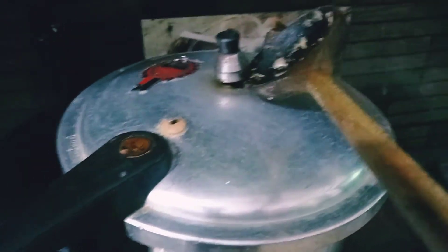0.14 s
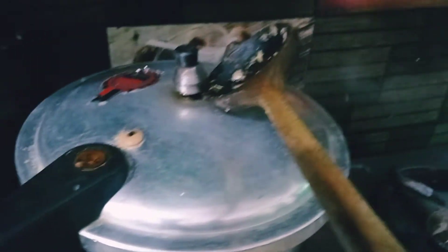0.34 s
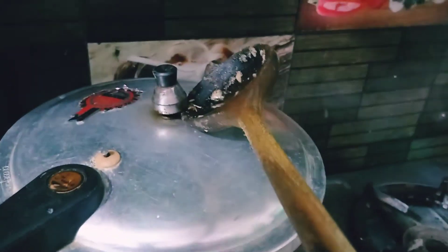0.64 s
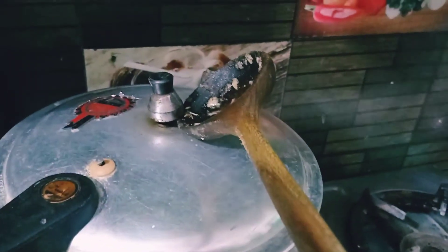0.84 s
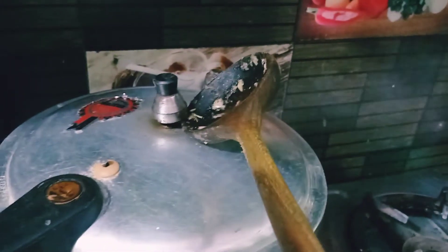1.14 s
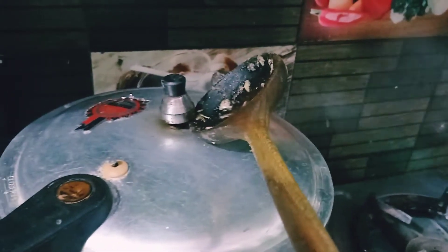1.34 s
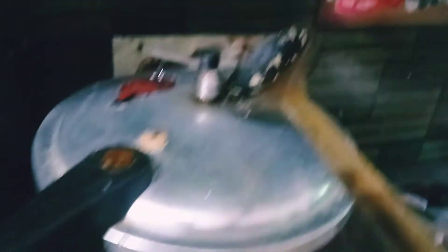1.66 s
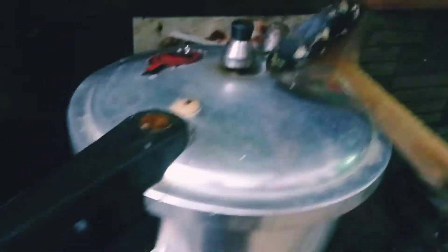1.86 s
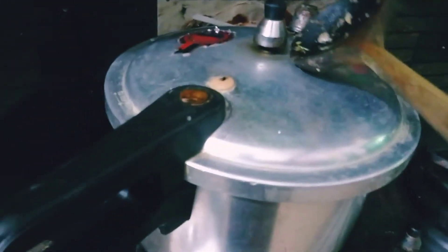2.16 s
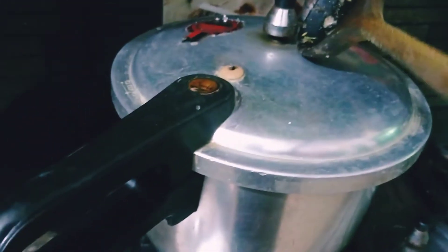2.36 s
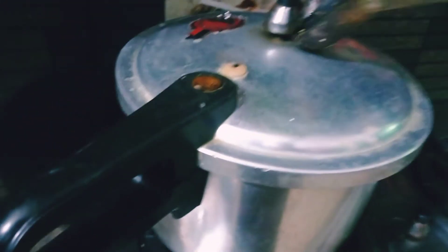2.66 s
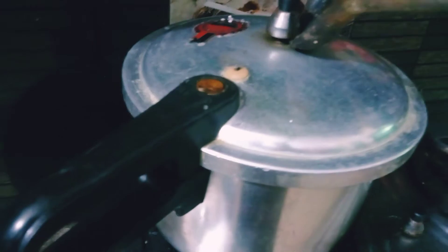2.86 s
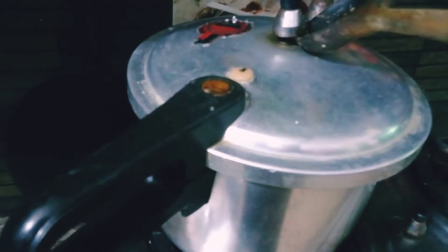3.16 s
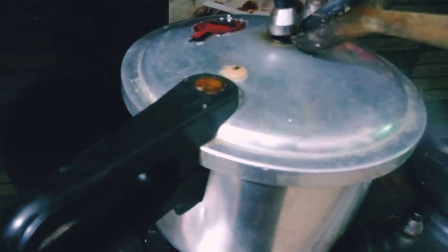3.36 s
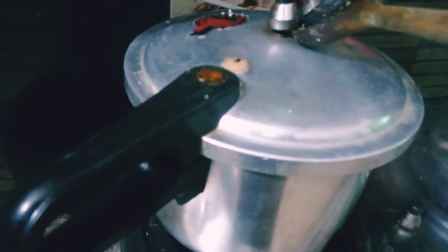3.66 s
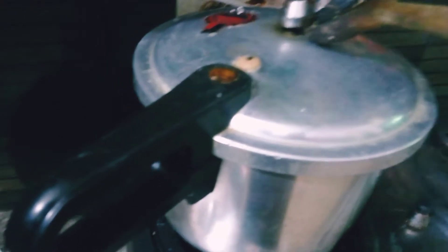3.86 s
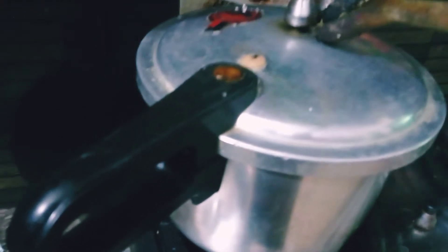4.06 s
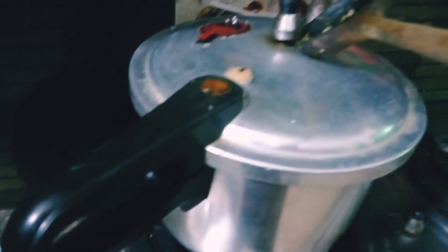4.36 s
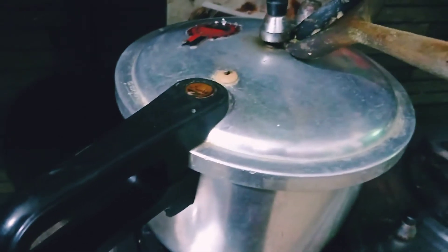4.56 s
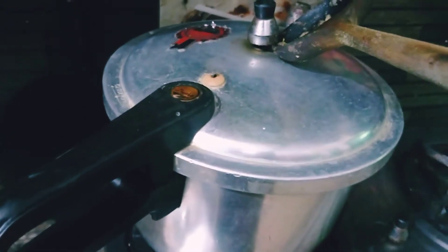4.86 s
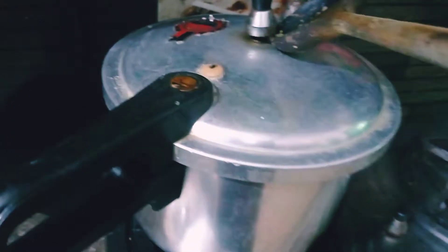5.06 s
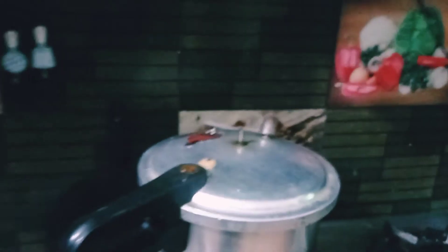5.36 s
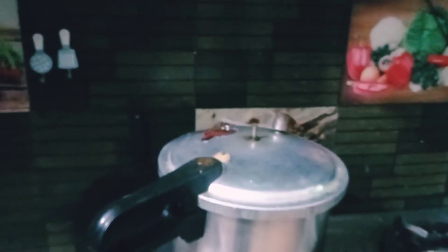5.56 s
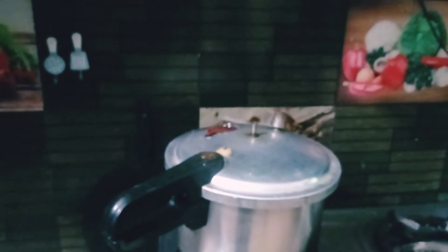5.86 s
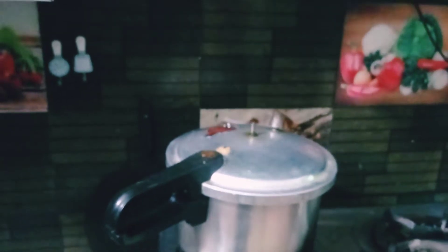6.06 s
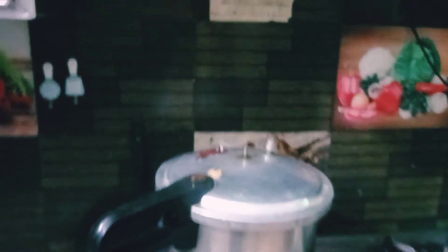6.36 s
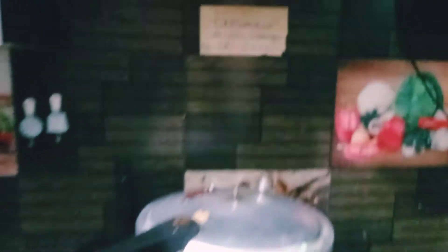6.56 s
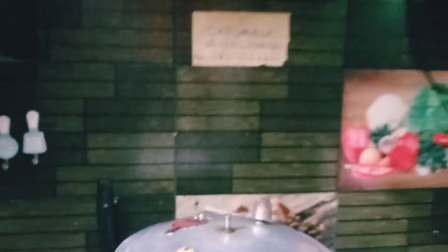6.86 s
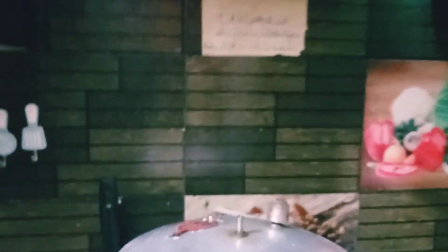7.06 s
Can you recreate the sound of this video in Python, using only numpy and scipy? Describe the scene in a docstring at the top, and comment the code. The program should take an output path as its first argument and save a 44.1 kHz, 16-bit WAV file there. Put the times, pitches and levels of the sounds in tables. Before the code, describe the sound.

From 0 to 1.8 seconds, a pressure cooker close to the microphone releases a strong, bright rush of steam, slightly fluttering, with a thin breathy whistle high inside it. At about 1.8 the valve weight drops: a dull, hollow knock rings the metal pot with a low, wavering hum, and the hiss dies away quickly. Another knock follows near 2.1, with weaker ones around 2.5 to 2.7, over a very thin, uneven leak with tiny puffs. At 3.0 a faint bump precedes a sudden loud burst of steam, which settles into a wavering rush with airy whistling between 3.8 and 4.8. At 5.13 it cuts out for an instant, blips, and returns as a crisper, thinner, softer hiss from further away, steady until about 7 seconds. Around 6.6 to 6.75 there is a barely audible finger rub and a small tap on the microphone.

```python
"""In a kitchen, a pressure cooker vents on a stove, close to a microphone. A ladle tilts the valve weight, slips off
with knocks that ring the pot, leaves a thin leak, then lifts the weight again. At an edit cut the sound stops,
blips and fades in on the bare vent from further away. The steam is shaped noise with breathy tones, the pot is
a set of fading sines, and fingers rub and tap the microphone's case over a faint steady background."""
import sys
import numpy as np
from scipy import signal
from scipy.fft import rfft, irfft, next_fast_len
from scipy.io import wavfile
from scipy.ndimage import uniform_filter1d, map_coordinates

SR = 44100
rng = np.random.default_rng(int(sys.argv[2]) if len(sys.argv) > 2 else 0)


def file_out(sig):
    """Save sig as 16-bit WAV at sys.argv[1]."""
    # one column per channel
    cols = np.atleast_2d(sig).T
    # limit, then scale
    lim = np.clip(cols, -1, 1)
    pcm = np.round(lim * 32767).astype(np.int16)
    wavfile.write(sys.argv[1], SR, pcm)


N = 317961  # length in samples

# The kitchen and microphone at rest. Each row: frequency in Hz, relative strength in dB per Hz.
AIR = [(12, -51), (20, -5.5), (95, -4.5), (168, -5.5), (245, 0.5), (290, -1.5), (604, -20), (1800, -31),
       (2340, -44), (3960, -120)]
# A finger slides on the case. One row: start in seconds, length in seconds, level in dB.
RUB = (6.585, .11, -72)
# A finger taps the case. One row: start in seconds, then the strengths in dB of tick, snap and bump before shaping.
TAP = (6.7355, -45, -27, -54)
# How the pot rings. Each row: frequency in Hz, strength in dB, time to fall 60 dB in seconds, sign (+1 or -1).
POT_MODES = [(270.5, -6, .55, 1), (278.3, -8, .45, -1), (371, 0, .4, 1), (474, -8, .2, 1),
             (620, -16, .15, 1), (1125, -14, .12, 1), (1265, -14, .12, 1)]
# Ladle knocks and later swells of the ringing pot. Each row: start in seconds, ring level in dB, swell in seconds,
# extra dB for the second mode, extra dB for the upper modes, thud level in dB, time for the thud to fall 60 dB
# in seconds.
KNOCKS_AND_SWELLS = [(1.809, -33.5, 0.063, -28, 2, -48, 0.31), (1.851, -67, 0.046, 29.5, 25, -48, 0.34),
                     (2.096, -36, 0.065, -4, 2, -51.5, 0.42), (2.529, -45, 0.072, -16, -9, -62, 0.17),
                     (2.667, -50, 0.039, -18, -20, -71, .15), (2.87, -81, .02, 6, 10, -77, .15),
                     (3.036, -68, 0.017, 10, 11, -51, 0.24), (3.142, -53, 0.041, 0, 7, -56, 0.58)]
# Breathy tones in the gap around the weight. Each row: start in seconds, length in seconds, pitch in Hz,
# width in Hz, level in dB.
WHISTLES = [(0.293, 1.43, 4223, 280, -36), (.3, 1.1, 4640, 160, -37.5), (1.09, 0.17, 4260, 350, -32.5),
            (2.545, 0.069, 810, 90, -73), (2.766, 0.046, 820, 90, -70), (2.885, 0.057, 870, 90, -66.5),
            (3.8, 0.057, 2340, 220, -43), (3.9, 0.31, 4570, 150, -34.5), (4.207, 0.085, 2250, 220, -38),
            (4.198, 0.43, 5040, 450, -34), (4.36, 0.097, 2298, 260, -32), (4.545, 0.031, 2250, 220, -30),
            (4.754, 0.054, 2220, 220, -37), (5.02, 0.056, 5040, 300, -34), (5.044, 0.021, 2180, 220, -36)]
# The jet in four states: weight tilted, weight seated, weight lifted, bare vent from afar. Each row: time in seconds,
# hiss level in dB, then rumble, roar, fizz and sizzle in dB relative to the hiss.
JET_LEVELS = [
    [(0.0, -31, -10, -5.5, -12, -19), (0.224, -28.5, -13, -5.5, -17, -18),
     (0.482, -32, -9.5, -3, -13, -14.5), (0.962, -29.5, -10.5, -7, -15.5, -20),
     (1.51, -31, -10, -4, -14, -16), (1.724, -27.5, -12, -7.5, -14.5, -30),
     (1.79, -30.5, -10.5, -7.5, -14, -22)],
    [(2.1, -52.5, -19, -13, -18, -24), (2.16, -52.5, -35, -16, -16, -25),
     (2.352, -49.5, -48, -21, -26, -27), (2.496, -52.5, -31, -14.5, -16, -24),
     (2.57, -43, -30, -23, -23, -26), (2.636, -54.5, -26, -8.5, -14, -26),
     (2.838, -43, -21.5, -15.5, -16, -25), (2.948, -58.5, -13, -4, -14, -23),
     (3.0, -46, -30, -18, -15, -28.5)],
    [(2.98, -56, -30, -15, -14, -36), (3.0, -44.5, -11, -15, -12, -19),
     (3.06, -20.5, -21.5, -12.5, -15, -25), (3.12, -27.5, -10.5, -11, -12, -16),
     (3.21, -30, -15.5, -13, -10, -14), (3.45, -27, -23.5, -16, -14.5, -17.5),
     (3.56, -31.5, -15.5, -9, -11, -7), (3.81, -25, -18, -9, -19.5, -16.5),
     (4.06, -27.5, -14.5, -10, -17, -14), (4.38, -29, -13.5, -8, -19, -16),
     (4.88, -25, -16, -11.5, -20.5, -21), (5.09, -26.5, -16.5, -12.5, -20, -21),
     (5.11, -27.5, -18.5, -13, -17, -21)],
    [(5.17, -32, -21.5, -13.5, -9, -14), (5.41, -32.5, -24, -13.5, -14.5, -14),
     (6.37, -34, -24, -13, -11, -25), (6.73, -36.5, -18.5, -8.5, -11, -21),
     (7.2, -34.5, -21.5, -10.5, -13, -20)],
]
# The colour of the jet in each state. Each row: frequency in Hz, relative strength in dB per Hz.
TILTED_COLOUR = [(59, -84), (100, -54), (379, -32), (671, -16), (1190, -7.5), (1320, -10), (1530, -6.5),
                 (1970, -4.5), (2340, 3), (3500, -4), (4230, 3), (6740, -2.5), (8320, -11), (11400, -19),
                 (15700, -21)]
SEATED_COLOUR = [(320, -45), (550, -28), (814, -20), (1030, -22.5), (2000, -21.5), (4260, -11.5),
                 (4830, -6), (5720, -4.5), (7260, -5.5), (7900, -16.5), (9340, -16.5), (10200, -21.5),
                 (13600, -31), (15700, -26)]
LIFTED_COLOUR = [(59, -80), (100, -51), (248, -28.5), (567, -22), (700, -10), (942, -7.5), (1320, -10),
                 (1530, -6), (1850, -14.5), (2240, -4.5), (3010, -14.5), (6190, -7), (10100, -28),
                 (13300, -35.5), (15700, -39)]
BARE_COLOUR = [(59, -70), (100, -33), (294, -61), (334, -37.5), (459, -40.5), (700, -26.5), (2190, -19),
               (3210, -19), (4510, -5.5), (5010, -14.5), (6320, -4.5), (7980, -20), (9250, -9.5),
               (13500, -3), (15700, 3)]
# Resonances of the microphone port. Each row: frequency in Hz, width in Hz, boost in dB.
PORT = [(6440, 730, 4), (15140, 1200, 15)]
# Standing ridges between lid, ladle and tiles, one list per state. Each row: frequency in Hz, width in Hz, boost in dB.
RIDGES = [
    [(241, 170, 8), (1540, 53, 7), (4690, 20, 3), (6240, 91, 5), (6840, 69, 12)],
    [(5750, 94, 9.5), (6230, 99, 7.5), (6500, 87, 6), (6740, 58, 0)],
    [(2380, 89, -2), (5630, 27, 7.5), (6323, 97, 8.5), (6450, 92, -5), (6910, 150, 8)],
    [(4480, 120, -5), (5630, 62, -11), (6570, 110, -13.5)],
]
# Borders in Hz between rumble, roar, edge, hiss, fizz and sizzle.
LAYER_BORDERS_HZ = [1800, 3400, 5200, 8500, 13800]
# Depth in dB of the drifting ridges in each state, before the bass is deepened.
DRIFT_DB = [1.63, 1.9, 2.22, 1.95]
# Base level in dB of the edge over the hiss in each state.
EDGE_DB = [-1.3, 0.62, 0.35, -4.9]
# Time in seconds for rumble, roar, edge, hiss, fizz and sizzle to fall 60 dB once the weight drops.
DIE_T60 = [.55, 0.45, 0.65, .38, 0.21, .26]
# Times in seconds when the weight lifts and when the bare vent takes over.
HANDOVER_TIMES = [3.0, 5.14]

AIR_DB = -78.5
CLACK_UNDER_THUD_DB, CLACK_T60 = 3, .13  # dB below the thud, seconds to fall 60 dB
SWAY_RAD, SLOSH_DB = .7, 1.2  # water moving inside the pot sways the phase and the level
FLICKER_DB, SWELL_S, FADE_S = 1.2, 0.014, 0.066  # flicker, rise and fall of the breathy tones
SHUT_S = 1.793  # the weight drops onto its seat
HANDOVER_S = 0.026  # length of each handover
EDGE_FOLLOWS = 0.69  # dB of edge per dB of roar
CUT_S, GAP_S, BLIP_S, RETURN_S = 5.1255, .0229, .0014, .0035  # edit cut; lengths of silence, blip, fade in
BLIP_DB, RETURN_DB = -3, -22  # gain of the blip, and where the fade in starts
TOP_HZ = 15720  # middle of the upper cutoff


def amp(db):
    """Turn decibels into a plain multiplier."""
    return 10 ** (np.asarray(db) / 20)


def unit(x):
    """Scale to an average (RMS) strength of one."""
    return x / np.sqrt(np.mean(x ** 2) + 1e-20)


def along(points, hz):
    """Read a curve of (Hz, value) points, with straight lines on a log frequency axis."""
    f, values = np.transpose(points)
    return np.interp(np.log(hz + 1), np.log(f + 1), values)


def curves(rows):
    """Give one value per sample for each column after the time."""
    times, *columns = np.transpose(rows)
    return [np.interp(np.arange(N) / SR, times, column) for column in columns]


def wobble(rate, size=N):
    """Draw a smooth random curve through rate random points a second."""
    points = rng.standard_normal(int(size * rate / SR) + 4)
    return map_coordinates(points, [np.arange(size) * rate / SR])


def filtered(x, response):
    """Multiply the spectrum of x by a response that depends on frequency."""
    m = next_fast_len(N + 8192)
    return irfft(rfft(x, m) * response(np.fft.rfftfreq(m, 1 / SR)), m)[..., :N]


def boosts(peaks, hz):
    """Add up, in dB, bell-shaped boosts given as (Hz, width, boost)."""
    return sum(db / (1 + (2 * (hz - centre) / width) ** 2) for centre, width, db in peaks)


def gate(t, length, rise, fall):
    """Rise just before time 0, hold for the length, then fall."""
    ramp = np.minimum(1 + t / rise, 1 - (t - length) / fall)
    return np.sin(np.pi / 2 * np.clip(ramp, 0, 1)) ** 2


def patches(x, size, hz_bins, frames, depth_db):
    """Vary the gain at random over frequency and time, smoothly and more deeply in the bass."""
    f, _, z = signal.stft(x, SR, nperseg=size)
    field = uniform_filter1d(rng.standard_normal(z.shape), hz_bins, axis=0)
    field = uniform_filter1d(field, frames, axis=1)
    depth = depth_db * (1 + 1.4 / (1 + (f[:, None] / 450) ** 2))
    return signal.istft(z * amp(depth * unit(field)), nperseg=size)[1][:N]


def kitchen():
    """The room and microphone at rest give a faint steady floor of shaped noise."""
    floor = filtered(rng.standard_normal(N), lambda hz: amp(along(AIR, hz)))
    return amp(AIR_DB) * unit(floor)


def fingers():
    """Skin sliding on the case is lumpy low noise; a tap is three short bursts: tick, snap and low bump."""
    start, length, rub_db = RUB
    rub = filtered(rng.standard_normal(N), lambda hz: np.exp(-((hz - 190) / 90) ** 2))
    rub = rub * amp(2.1 * wobble(45))
    out = amp(rub_db) * gate(np.arange(N) / SR - start, length, .025, .025) * unit(rub)

    s, tick_db, snap_db, bump_db = TAP
    t = np.arange(SR // 10) / SR
    tick = amp(tick_db) * np.exp(-((t - .003) / 0.0026) ** 2) * np.sin(2 * np.pi * 500 * t)
    snap = amp(snap_db) * np.exp(-((t - .002) / .00025) ** 2) * np.sin(2 * np.pi * 1500 * (t - .002))
    bump = amp(bump_db) * np.exp(-((t - .011) / 0.0093) ** 2) * np.sin(2 * np.pi * 110 * t)
    out[round(s * SR):][:len(t)] += tick + snap + bump
    return out


def ringing_pot():
    """Soft knocks thud and the pot rings; its lowest mode is a close pair, so it beats, and it swells again later."""
    out, t = np.zeros(N + SR), np.arange(SR // 2) / SR
    dull = signal.butter(2, [190, 560], "bandpass", fs=SR)
    bright = signal.butter(1, [600, 1800], "bandpass", fs=SR)
    for s, ring_db, swell, second_db, upper_db, thud_db, thud_t60 in KNOCKS_AND_SWELLS:
        rise = np.sin(np.pi / 2 * np.clip(t / swell, 0, 1)) ** 2
        # the first two sines are the lowest pair, the third is the second mode
        mode_db = [0, 0, second_db] + [upper_db] * (len(POT_MODES) - 3)
        sway = SWAY_RAD * wobble(25, size=len(t))
        slosh_db = SLOSH_DB * wobble(18, size=len(t))
        ring = np.zeros(len(t))
        for (hz, db, t60, sign), extra_db in zip(POT_MODES, mode_db):
            fading = amp(db + extra_db + slosh_db - 60 * t / t60)
            ring += sign * fading * np.sin(2 * np.pi * hz * t + sway)
        thud_noise = unit(signal.lfilter(*dull, rng.standard_normal(len(t))))
        thud = amp(thud_db - 60 * t / thud_t60) * thud_noise
        clack_noise = unit(signal.lfilter(*bright, rng.standard_normal(len(t))))
        clack = amp(thud_db - CLACK_UNDER_THUD_DB - 60 * t / CLACK_T60) * clack_noise
        out[round(s * SR):][:len(t)] += amp(ring_db) * rise * ring + thud + clack
    return out[:N]


def whistle():
    """Air in the gap around the weight sings: each tone is narrow noise that swells, flickers and fades."""
    out, t = np.zeros(N), np.arange(N) / SR
    for s, length, hz, width_hz, db in WHISTLES:
        # two slow noises carried by a cosine and a sine make a narrow band around the pitch
        slow = filtered(rng.standard_normal((2, N)), lambda f: np.exp(-(2 * f / width_hz) ** 2))
        tone = unit(slow[0] * np.cos(2 * np.pi * hz * t) + slow[1] * np.sin(2 * np.pi * hz * t))
        level = amp(db + FLICKER_DB * wobble(10))
        out += level * gate(t - s, length, SWELL_S, FADE_S) * tone
    return out


def turbulence(patchy_db, ridge_db, flutter_db):
    """Noise in quick patches flutters; echoes off lid and tiles draw fine ridges that drift slowly."""
    eddies = patches(rng.standard_normal(N), 512, 5, 12, patchy_db)
    ridged = patches(eddies, 4096, 5, 30, ridge_db)
    return ridged * amp(flutter_db * wobble(40))


def layer_bands(hz):
    """Split the spectrum into six neighbouring bands, from rumble up to sizzle."""
    above = [1 / (1 + (border / (hz + 1)) ** 16) for border in LAYER_BORDERS_HZ]
    return np.abs(np.diff([0 * hz + 1, *above, 0 * hz], axis=0))


def jet():
    """Large eddies rumble and roar, the rim sings, small eddies hiss, fizz and sizzle; each state has its colour."""
    t, out = np.arange(N) / SR, np.zeros(N)
    dying = amp(-60 * np.maximum(t - SHUT_S, 0) / np.array(DIE_T60)[:, None])
    lifted, bare = [np.clip((t - s) / HANDOVER_S + .5, 0, 1) for s in HANDOVER_TIMES]
    # the leak comes in as the tilted hiss (layer 3) dies
    seated = np.sqrt((1 - dying[3] ** 2) * (1 - lifted))
    state_gains = [dying, seated, np.sqrt(lifted - bare), np.sqrt(bare)]
    colours = [TILTED_COLOUR, SEATED_COLOUR, LIFTED_COLOUR, BARE_COLOUR]
    for k, (rows, colour) in enumerate(zip(JET_LEVELS, colours)):
        air = turbulence(patchy_db=0.4, ridge_db=DRIFT_DB[k], flutter_db=0.49)

        def response(hz):
            colour_db = along(colour, hz) + boosts(PORT + RIDGES[k], hz)
            return amp(colour_db) * np.sqrt(layer_bands(hz))

        layers = [unit(layer) for layer in filtered(air, response)]
        hiss_db, rumble_db, roar_db, fizz_db, sizzle_db = curves(rows)
        edge_db = EDGE_DB[k] + EDGE_FOLLOWS * roar_db
        over_hiss_db = [rumble_db, roar_db, edge_db, 0 * t, fizz_db, sizzle_db]
        out += np.sum(state_gains[k] * amp(hiss_db + over_hiss_db) * layers, axis=0)
    return out


def scene():
    """Add all the sources; one microphone feeds both channels."""
    mono = kitchen() + fingers() + ringing_pot() + whistle() + jet()
    return np.tile(mono, (2, 1))


def record(dry):
    """At an edit cut the sound stops, blips and fades in; nothing passes above the band limit."""
    t = np.arange(N) / SR - CUT_S - GAP_S  # time 0 is the end of the silence
    fade_db = RETURN_DB * np.clip(1 - (t - BLIP_S) / RETURN_S, 0, 1)
    after = amp(np.where(t < BLIP_S, BLIP_DB, fade_db))
    cut_gain = (t < -GAP_S) + (t > 0) * after

    def band_limit(hz):
        return np.sin(np.pi / 2 * np.clip((TOP_HZ + 60 - hz) / 120, 0, 1)) ** 2

    return filtered(dry * cut_gain, band_limit)


dry = scene()
out = record(dry)
file_out(out)
```